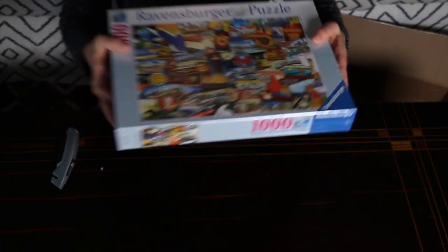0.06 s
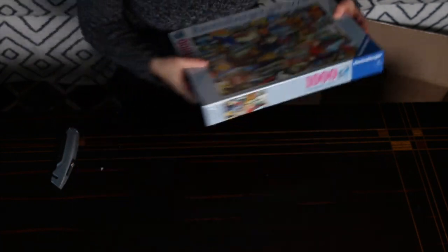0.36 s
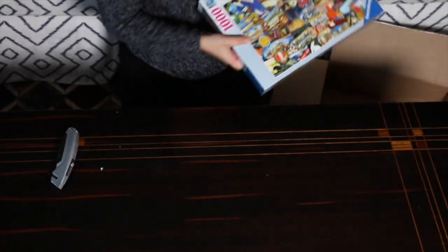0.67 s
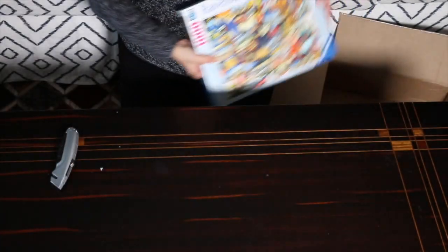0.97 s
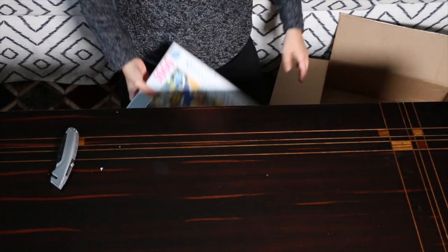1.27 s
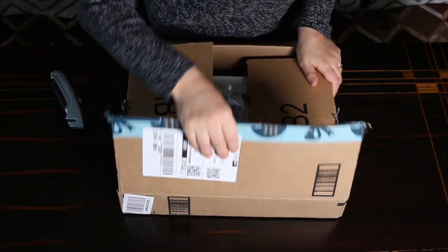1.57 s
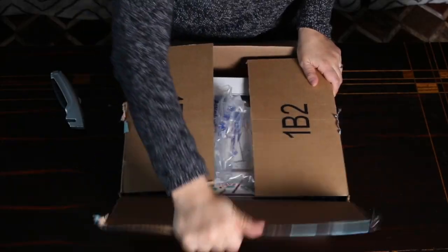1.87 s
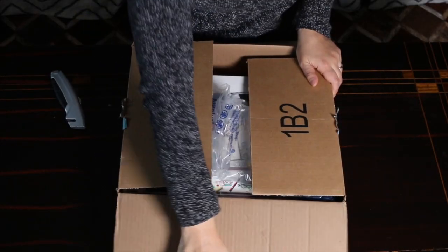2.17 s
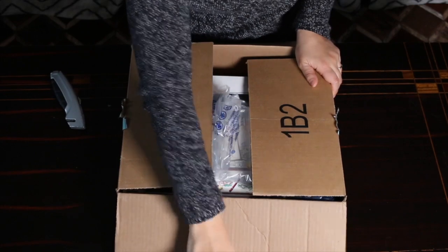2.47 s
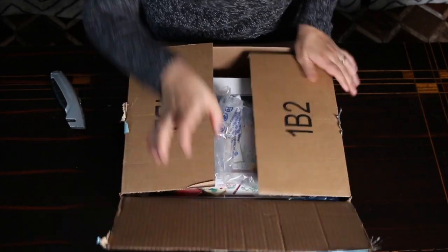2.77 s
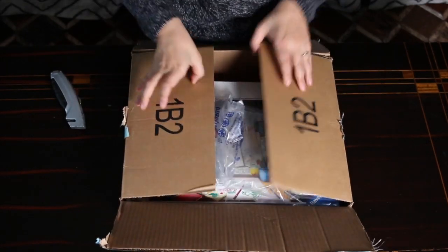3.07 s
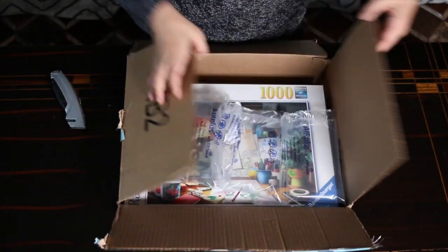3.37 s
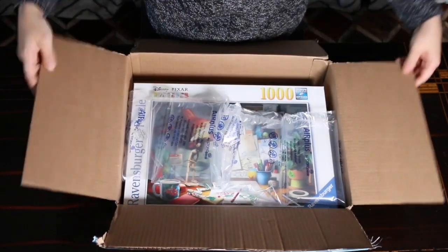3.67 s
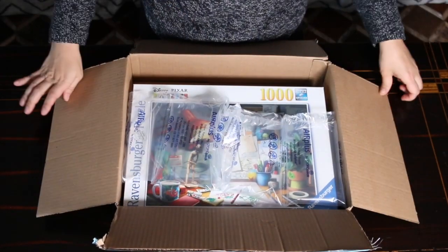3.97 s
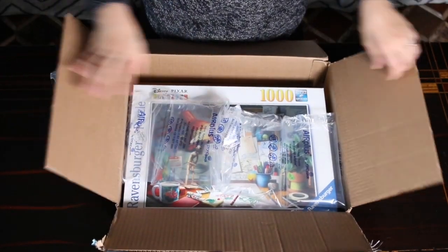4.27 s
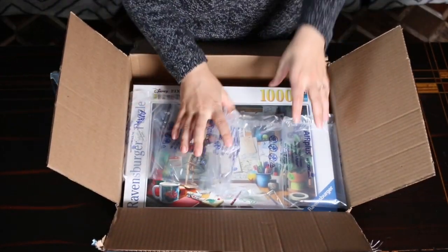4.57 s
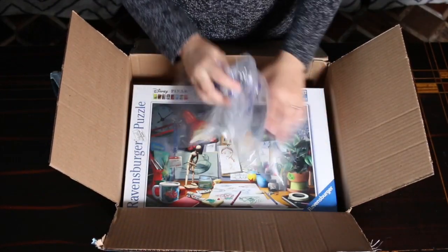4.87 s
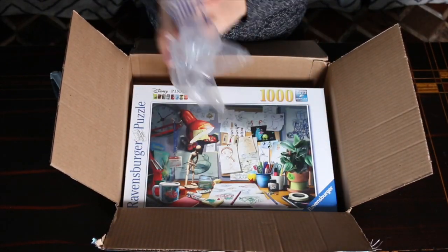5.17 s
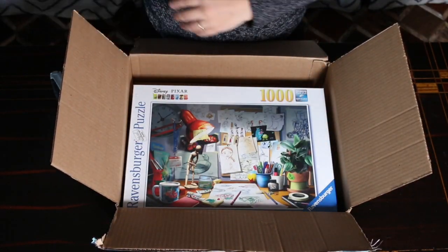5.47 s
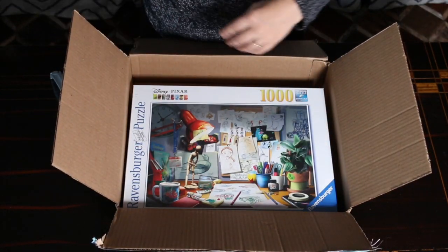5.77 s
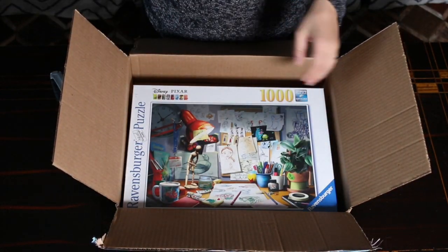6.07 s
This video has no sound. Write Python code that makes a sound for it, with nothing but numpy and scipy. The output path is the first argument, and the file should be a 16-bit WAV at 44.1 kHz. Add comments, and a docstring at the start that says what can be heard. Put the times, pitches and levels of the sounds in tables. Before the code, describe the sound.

Cardboard flaps slap down, crack and scrape open close by, followed by the crackling of plastic packing pillows being pulled out.

```python
"""Opening a cardboard box

A boxed puzzle is put aside and a shipping box is opened on a table, close up in a small room.
The front flap slaps down and its fold cracks; the side flaps scrape, squeak, knock and groan
as they are spread. Plastic air pillows are pulled out, crinkling and snapping, and dropped aside.
A limiter ducks after the two loudest blows."""
import sys
import numpy as np
from scipy import signal
from scipy.io import wavfile
from scipy.ndimage import uniform_filter1d

SR = 44100
rng = np.random.default_rng(int(sys.argv[2]) if len(sys.argv) > 2 else 0)


def log_audio(samples):
    """Write samples as a 16-bit WAV file to the path given in sys.argv[1]."""
    # one column per channel
    frames = np.atleast_2d(samples).T
    # limit to full scale, then quantise
    limited = np.clip(frames, -1, 1)
    pcm = np.round(limited * 32767).astype(np.int16)
    wavfile.write(sys.argv[1], SR, pcm)


N = 270333
TIME = np.arange(N) / SR
HIT_TIME = np.arange(8192) / SR  # seconds into a one-shot
BINS = np.fft.rfftfreq(4096, 1 / SR)

# Cue levels are faders; each layer adds its own trim. an edge catches and drags, and at 1.943 s a short rush of
# air leads into the flap slap: (time [s], level [dB], decay [s], hiss over level [dB], rasp pitch [Hz], rasp
# over level [dB])
EDGE_SCUFFS = [(0.099, -57, 0.014, -18, 640, 7), (0.126, -48.5, 0.019, -10, 605, 4),
               (1.006, -56.5, 0.067, 5, 2700, 5), (1.268, -68.5, 0.093, 18.5, 2820, -2),
               (1.44, -49, 0.026, 3.5, 2480, 0), (1.836, -37, 0.017, 4.5, 680, 6),
               (1.879, -38, 0.021, -8, 785, 4), (1.943, -24, 0.0042, -10, 890, -14),
               (2.154, -32, 0.014, -16, 2980, 1.5), (2.955, -47.5, 0.15, -16, 1630, 0.5),
               (3.076, -31.5, 0.012, -3, 1580, 5.5), (3.09, -32, 0.028, 0.5, 1710, 4.5),
               (3.655, -40.5, 0.075, 1.5, 524, 4), (3.963, -47, 0.049, -12, 597, 12.5),
               (4.183, -23.5, 0.0047, -5.5, 3280, 1), (4.205, -28, 0.052, -7, 523, -10),
               (4.312, -31.5, 0.014, -23, 820, -5), (6.055, -36.5, 0.054, 9, 2090, 4)]
# fingers and flaps hit the box: (time [s], clack [dB], thump [dB], thump pitch [Hz])
BOX_KNOCKS = [(0.128, -58, -42, 196), (0.594, -52, -40.5, 212), (1.362, -36, -39.5, 574),
              (1.559, -26.5, -34.5, 211), (1.822, -31, -28, 231), (3.014, -21.5, -21.5, 215),
              (3.336, -27.5, -31.5, 865), (3.371, -25.5, -55, 736), (3.408, -29, -35, 243),
              (3.926, -26.5, -30.5, 233), (3.959, -34, -24.5, 760), (3.978, -43, -27, 244.6),
              (3.994, -45, -30, 380), (4.01, -29.5, -22, 329), (4.183, -16.5, -31, 224),
              (4.191, -19.5, -18.5, 240), (4.213, -32, -21, 522), (4.255, -20.5, -23, 760),
              (4.306, -35, -28.5, 239), (4.321, -48, -30.5, 750), (4.603, -18.5, -32, 234),
              (4.619, -23, -27, 234), (5.58, -29, -40, 389), (5.666, -32.5, -36.5, 357)]
# a hand or flap slides over cardboard: (start [s], length [s], drone [dB], hiss [dB])
SLIDES = [(0.276, 0.19, -79, -59.5), (0.37, 0.22, -52, -73), (0.57, 0.27, -53, -66),
          (0.81, 0.26, -54.5, -74), (0.96, 0.24, -63, -56), (1.093, 0.61, -52, -54),
          (1.441, 0.12, -48, -44.5), (1.55, 0.37, -50.5, -57.5), (1.716, 0.17, -54, -43),
          (1.791, 0.27, -40.5, -38.5), (2.131, 0.24, -48, -43.5), (2.546, 0.28, -44, -48.5),
          (2.81, 0.19, -39.5, -49.5), (2.952, 0.058, -46, -43.5), (3.002, 0.28, -38.5, -42.5),
          (3.325, 0.49, -45, -44), (3.585, 0.3, -44.5, -44.5), (3.77, 0.33, -46, -48),
          (4.329, .25, -61, -79)]
# the largest creases snap over, and the crack at 1.822 s sharpens a knock: (time [s], level [dB])
CREASE_SNAPS = [(1.271, -43), (1.305, -37), (1.325, -39), (1.822, -24.5), (4.542, -26.5), (4.603, -22.5),
                (4.637, -10), (4.669, -13.5), (4.683, -10), (4.714, -10), (4.747, -13), (4.78, -5),
                (4.808, -7.5), (4.837, -5), (4.843, -12.5), (4.931, -8.5), (5.04, -27), (5.073, -10),
                (5.17, -19), (5.203, -7), (5.476, -25), (5.62, -24.5), (5.676, -31), (5.727, -26.5),
                (5.748, -22), (5.852, -25.5), (5.944, -31), (6.072, -18), (6.075, -10.5)]
# the front flap lands and rebounds: (time [s], level [dB], crack over level [dB])
FLAP_SLAPS = [(1.948, 10, -13), (1.9638, -5, -9)]
# its fold gives way in two jerks: (time [s], level [dB], splinter over level [dB])
FOLD_CRACKS = [(2.3121, 4.5, -21), (2.318, 5.5, -9)]
# a flap edge squeaks along its neighbour: (start [s], length [s], pitch [Hz], level [dB])
FLAP_SQUEAKS = [(3.087, 0.049, 594, -29.5)]
# the squeak's harmonics: (multiple of the pitch, level [dB])
SQUEAK_HARMONICS = [(1, -3.5), (3, 0), (5, -3.5)]
# a swinging flap shoves the air: (time [s], level [dB], pitch [Hz], decay [s])
AIR_PUFFS = [(3.63, -26.5, 90, 0.0058)]
# the rising groan of a side flap bent back: (time [s], pitch [Hz], level [dB])
GROAN_CURVE = [(4.196, 263, -40), (4.223, 338.5, -22), (4.243, 472, -29), (4.256, 807, -24),
               (4.272, 813, -29), (4.3, 840, -52)]
# pillows are squeezed, lifted out and dropped: (start [s], hold [s], fizz [dB], hollow rustle [dB])
PILLOW_MOVES = [(4.578, .06, -30, -36), (4.645, 0.13, -27, -38.5), (4.768, 0.17, -26, -39),
                (4.881, 0.392, -22.5, -34.5), (5.245, 0.12, -22, -32.5), (5.45, 0.045, -36, -37.5),
                (5.628, 0.17, -38, -55), (5.796, 0.46, -46.5, -55.5)]

# resonances of handled cardboard: (frequency [Hz], width [Hz], level [dB])
PANEL_RESONANCES = [(240, 66, 7), (394, 20, 11.5), (535, 55, 2.5), (756, 280, 0.5), (1040, 250, -17),
                    (1570, 100, -9), (1790, 480, -6), (2700, 290, -12)]
# ringing cardboard: (frequency [Hz], level [dB], t60 [s])
SLAPPED_BOX_MODES = [(133, -19, 0.019), (199, -5.5, 0.089), (243.5, -11, 0.12), (306, 5, 0.017),
                     (418, -11.5, 0.046), (433, -17, 0.097), (537, -11.5, 0.031), (764, -19, 0.031),
                     (1200, -13, 0.013)]
TAUT_FLAP_MODES = [(421, -45, 0.055), (498, -6, 0.025), (699, -2.5, 0.025), (858, -10.5, 0.036),
                   (1210, 3.5, 0.0055), (1810, -8.5, 0.019), (2500, -6, 0.0091)]

# tone curves of the noise layers: (frequency [Hz], relative level [dB])
CLACK_EQ = [(40, -17), (100, -5), (350, -1), (800, 4.5), (1800, -2), (3200, -13.5), (7000, -17.5),
            (16000, -21.5)]  # dry cardboard
HISS_EQ = [(300, -37), (1200, 11), (2800, 13), (6000, 7.5), (9000, 2), (16000, -13.5)]  # paper surface
BRUSH_EQ = [(300, -7), (1500, 5), (3000, 1.5), (6000, 1.5), (9000, 1), (11000, 1), (16000, 3.5)]  # brushing cloth
SNAP_BODY_EQ = [(50, -29), (150, -13), (500, 17), (2000, 10.5), (4500, 6), (8000, -10), (16000, 2)]  # a crease's midrange pop
SNAP_EDGE_EQ = [(100, -5), (1000, 9), (5000, 15), (8000, 14), (12500, 8), (16000, 6)]  # its bright click
SLAP_BLOOM_EQ = [(40, -10), (100, -8.5), (180, -1.5), (290, -1), (420, 3.5), (480, -4), (560, -11),
                 (800, -18), (2000, -25), (5000, -33.5), (9000, -36.5), (16000, -55)]  # what the slap throws into the room
CRACK_BLOOM_EQ = [(80, -16), (300, 4.5), (650, 5.5), (1200, 3), (2600, -1), (3800, -13), (7000, -16),
                  (10000, -25), (16000, -41)]  # what the fold throws into the room
FILM_EQ = [(100, -22), (600, -1.5), (1500, 2), (2600, -1.5), (4500, -2.5), (7000, -3), (10000, -5),
           (16000, -12)]  # thin plastic
PILLOW_EQ = [(60, -38), (130, -9.5), (210, 0), (330, -0.5), (600, -0.5), (1100, -5.5), (1700, -6),
             (3000, -32), (8000, -33)]  # air-filled pillows
FLOOR_EQ = [(20, -15), (40, -7), (60, 1), (110, -10), (250, -7), (500, -13), (1000, -21.5), (3000, -28),
            (6500, -28.5), (8700, -33.5), (10900, -22), (12800, -31.5), (16000, -25)]  # steady background noise

# the room's decay: (frequency [Hz], t60 [s])
REVERB_T60 = [(100, 0.8), (250, 0.1959), (600, 0.7038), (2000, 0.72), (5000, 0.83), (9000, 0.42),
              (16000, 1.32)]
# colour of the reverb and the microphone: (frequency [Hz], gain [dB])
REVERB_EQ = [(60, 15), (160, -3), (400, 4.5), (1200, 0.5), (3000, 0.5), (8000, 3.5), (16000, -8)]
MIC_EQ = [(20, -5), (5500, 1), (6900, 0), (8700, 6.5), (9700, 0), (10900, -8.5), (12800, 2), (16000, -7)]


def amp(db):
    """Decibels to gain."""
    return 10 ** (np.asarray(db) / 20)


def unit(x):
    """Scales to rms 1."""
    return x / np.sqrt(np.mean(x ** 2) + 1e-20)


def read(points, hz):
    """Reads a curve on a log-frequency axis."""
    f, value = np.transpose(points)
    return np.interp(np.log(hz + 1), np.log(f + 1), value)


def add(mix, s, sound):
    """Mixes a sound in at s seconds."""
    part = mix[max(round(s * SR), 0):][:len(sound)]
    part += sound[:len(part)]


def colour(x, gain, keep_power=True):
    """Minimum-phase filter from a gain over BINS; keep_power holds white noise at its level."""
    if keep_power:
        gain = gain / np.sqrt(np.mean(gain ** 2))
    log_gain = np.log(np.maximum(gain, 1e-5))
    mirrored = np.concatenate([log_gain, log_gain[-2:0:-1]])
    taps = np.fft.ifft(np.exp(np.conj(signal.hilbert(mirrored)))).real
    return signal.fftconvolve(x, taps)[:len(x)]


def eq(x, curve, keep_power=True):
    """Shapes a sound with a tone curve."""
    return colour(x, amp(read(curve, BINS)), keep_power)


def resonance(hz, q):
    """Gain over BINS of one resonant peak."""
    return 1 / np.hypot(1, q * (BINS / hz - hz / (BINS + 1)))


def panel(x):
    """Plays a sound through a cardboard panel's resonances, with the top rolled off."""
    power = sum(amp(db) ** 2 / (1 + ((BINS ** 2 - hz ** 2) / (width * BINS + 1)) ** 2)
                for hz, width, db in PANEL_RESONANCES)
    return colour(x, np.sqrt(power / (1 + (BINS / 5000) ** 2)))


def grains(size, per_s, spread_db):
    """Tiny clicks at random moments, their heights scattered by spread_db; rms 1."""
    chance, strength, sign = rng.random((3, size))
    height = amp(spread_db * np.minimum(-np.log(1 - strength), 4))
    return unit((chance < per_s / SR) * height * np.sign(sign - .5))


def burst(decay_s):
    """A short dying puff of noise."""
    return rng.standard_normal(len(HIT_TIME)) * np.exp(-HIT_TIME / decay_s)


def ring(modes, rise_s):
    """Struck modes build up during the contact, then die away."""
    tones = sum(amp(db - 60 * HIT_TIME / t60) * np.sin(2 * np.pi * hz * HIT_TIME)
                for hz, db, t60 in modes)
    return (1 - np.exp(-HIT_TIME / rise_s)) * tones


def arch(length, peak):
    """Speed of a hand move: from rest up to 1 at the share peak of its length, and back to rest."""
    progress = np.arange(0, length, 1 / SR) / length
    return np.sin(np.pi * progress ** (np.log(.5) / np.log(peak)))


def pressure(per_s, depth_db):
    """Uneven hand pressure: a gain that wanders at random."""
    knots = np.arange(0, TIME[-1] + 1, 1 / per_s)
    wander = rng.standard_normal(4096)[:len(knots)]
    return unit(amp(depth_db * np.interp(TIME, knots, wander)))


def waver(size, depth, smooth_samples):
    """A pitch factor that jitters around 1."""
    return 1 + depth * unit(uniform_filter1d(rng.standard_normal(SR), smooth_samples))[:size]


def scuffs():
    """Short drags, and one brief rush of air before the flap slap: a run of slips swells and dies, rasping in
    two modes of the caught edge."""
    out = np.zeros(N)
    for s, db, decay, hiss_db, hz, rasp_db in EDGE_SCUFFS:
        rise = 0.27 * decay
        swell = np.minimum(HIT_TIME / rise, np.exp((rise - HIT_TIME) / decay))
        deep, mid, fine, edge = (swell * grains(len(swell), per_s=2500, spread_db=2) for _ in range(4))
        body = amp(-5.5) * panel(deep) + amp(-1) * eq(mid, CLACK_EQ)
        rasp = colour(edge, resonance(hz, q=6.3) + amp(-14) * resonance(hz * 1.9, q=33))
        add(out, s, amp(db) * (body + amp(hiss_db) * eq(fine, HISS_EQ) + amp(rasp_db) * rasp))
    return out


def knocks():
    """Each knock bends a panel (thump), rattles the flutes (clack) and ticks on the surface."""
    out = np.zeros(N)
    for s, clack_db, thump_db, hz in BOX_KNOCKS:
        cycles = hz * HIT_TIME
        flex = np.sin(2 * np.pi * cycles) * np.exp(-cycles / 4.34) * (1 - np.exp(-cycles / 0.22))
        thump = amp(thump_db + 2.5) * (flex + 0.26 * panel(burst(0.019)))
        clack = amp(clack_db - 5.5) * eq(burst(0.0054), CLACK_EQ)
        tick = amp(clack_db - 19) * eq(burst(0.0082), HISS_EQ)
        add(out, s, thump + clack + tick)
    return out


def sliding():
    """Friction makes panels drone, paper rasp and cloth hiss, all riding the speed of the stroke."""
    drone = panel(grains(N, per_s=2500, spread_db=0))
    rasp = amp(-6.5) * eq(grains(N, per_s=1700, spread_db=0), CLACK_EQ)
    hiss = eq(grains(N, per_s=7200, spread_db=3.5), BRUSH_EQ)
    rub_gain, hiss_gain = np.zeros((2, N))
    for s, length, drone_db, hiss_db in SLIDES:
        speed = arch(length, peak=0.22)
        add(rub_gain, s, amp(drone_db - 3) * speed ** 0.7)
        add(hiss_gain, s, amp(hiss_db + 3.5) * speed ** 1.83)
    return (rub_gain * (drone + rasp) + hiss_gain * hiss) * pressure(per_s=60, depth_db=1.04)


def snaps():
    """Large creases flip over with a sharp crack; one such crack tops a knock."""
    out = np.zeros(N)
    for s, db in CREASE_SNAPS:
        body = amp(db - 9.5) * eq(burst(0.0037), SNAP_BODY_EQ)
        edge = amp(0.59 * db - 10) * eq(burst(0.001), SNAP_EDGE_EQ)  # softer snaps sound thinner
        add(out, s, body + edge)
    return out


def flap_slap():
    """The front flap slaps the table, booms the box and blooms into the room."""
    out = np.zeros(N)
    for s, db, crack_db in FLAP_SLAPS:
        # the edge touches first, then the whole face
        add(out, s, amp(db + crack_db) * eq(burst(0.00099), FILM_EQ))
        add(out, s + 0.00028, amp(db + 2.5) * ring(SLAPPED_BOX_MODES, rise_s=0.0016))
        add(out, s, amp(db + 14) * eq(room_tail(), SLAP_BLOOM_EQ))
    return out


def fold_crack():
    """Pressed further, the fold splinters, rings the taut flap and fills the room."""
    out = np.zeros(N)
    for s, db, splinter_db in FOLD_CRACKS:
        splinter = eq(burst(0.0013), HISS_EQ) + amp(-0.5) * eq(burst(0.0023), SNAP_BODY_EQ)
        flap = ring(TAUT_FLAP_MODES, rise_s=0.00057)
        add(out, s, amp(db) * (amp(splinter_db - 4) * splinter - flap))
        add(out, s, amp(db + 9) * eq(room_tail(), CRACK_BLOOM_EQ))
    return out


def squeak(sag_hz_per_s=630):
    """Two flaps stick and slip; the pitch sags as the pressure eases."""
    out = np.zeros(N)
    for s, length, hz, db in FLAP_SQUEAKS:
        speed = arch(length, peak=0.56)
        pitch = hz - sag_hz_per_s * TIME[:len(speed)]
        cycles = np.cumsum(pitch * waver(len(speed), depth=0.026, smooth_samples=100)) / SR
        tone = sum(amp(level) * np.sin(2 * np.pi * k * cycles) for k, level in SQUEAK_HARMONICS)
        add(out, s, amp(db) * speed * tone)
    return out


def air_puff():
    """A swinging flap shoves the air: a soft low push with no click."""
    out = np.zeros(N)
    for s, db, hz, decay in AIR_PUFFS:
        swell = HIT_TIME / decay * np.exp(1 - HIT_TIME / decay)
        add(out, s, amp(db) * swell * np.sin(2 * np.pi * hz * HIT_TIME))
    return out


def groan():
    """A side flap's fold sticks and slips, faster and a little unevenly as it is strained."""
    s, hz, db = np.transpose(GROAN_CURVE)
    t = np.arange(s[0], s[-1], 1 / SR)
    pitch = np.interp(t, s, hz) * waver(len(t), depth=0.049, smooth_samples=60)
    phase = 2 * np.pi * np.cumsum(pitch) / SR
    tone = unit(np.sin(phase) + amp(-11) * np.sin(2 * phase))
    out = np.zeros(N)
    add(out, s[0], amp(np.interp(t, s, db) - 6) * tone)
    return out


def crinkle(attack_s=0.041, release_db_per_s=217):
    """Thin film fizzes and crackles as it creases, over the hollow rustle of the air pillows."""
    fizz = eq(grains(N, per_s=6000, spread_db=3.5), FILM_EQ)
    clicks = grains(N, per_s=200, spread_db=1)
    crackle_power = signal.lfilter([1], [1, -np.exp(-1 / (0.00089 * SR))], clicks ** 2)  # short tails
    crackle = unit(eq(np.sqrt(crackle_power) * rng.standard_normal(N), FILM_EQ))
    film = amp(-3) * fizz + amp(-4.5) * crackle
    hollow = eq(grains(N, per_s=1000, spread_db=2), PILLOW_EQ)
    film_gain, hollow_gain = np.zeros((2, N))
    for s, hold, fizz_db, hollow_db in PILLOW_MOVES:
        tighten = np.clip((TIME - s) / attack_s, 0, 1)
        relax = amp(-release_db_per_s * np.maximum(TIME - s - hold, 0))
        film_gain = np.maximum(film_gain, amp(fizz_db) * tighten * relax)
        hollow_gain = np.maximum(hollow_gain, amp(hollow_db) * tighten * relax)
    return (film_gain * film + hollow_gain * hollow) * pressure(per_s=70, depth_db=1.1)


def room_tail():
    """Sparse reflections build up, then each band dies at its own speed; energy 1."""
    reflections = grains(SR, per_s=6000, spread_db=-1) * np.clip((TIME[:SR] - .004) / 0.0043, 0, 1)
    hz, frame_s, bands = signal.stft(reflections, SR, nperseg=256)
    decay = amp(-60 * frame_s / read(REVERB_T60, hz)[:, None])
    tail = signal.istft(bands * decay, SR, nperseg=256)[1]
    return tail / np.linalg.norm(tail)


def room(x, wet_db):
    """Adds the small room's reverb."""
    tail = eq(room_tail(), REVERB_EQ, keep_power=False)
    return x + amp(wet_db) * signal.fftconvolve(x, tail)[:N]


def scene():
    """Cardboard and plastic sit dead centre in one room; only a trace of background noise is wide."""
    cardboard = room(sliding() + scuffs() + groan() + air_puff(), wet_db=-9.5)
    cardboard += room(squeak(), wet_db=-17) + room(knocks(), wet_db=-5)
    plastic = room(crinkle() + snaps(), wet_db=-10.5)
    blows = flap_slap() + fold_crack()
    middle = cardboard + plastic + blows + amp(-51) * eq(rng.standard_normal(N), FLOOR_EQ)
    side = amp(-74) * eq(rng.standard_normal(N), FLOOR_EQ)
    return np.array([middle + side, middle - side])


def limiter(x, recover_db_per_s, attack_s):
    """The gain ducks on a peak over full scale and climbs back steadily."""
    over_db = np.maximum(20 * np.log10(abs(x).max(0) + 1e-9), 0)
    recovery_db = recover_db_per_s * TIME
    duck_db = np.maximum.accumulate(over_db + recovery_db) - recovery_db
    pole = np.exp(-1 / (attack_s * SR))
    return x * amp(-signal.lfilter([1 - pole], [1, -pole], duck_db))


def record(dry):
    """Microphone colour, limiter, hard clipping and a steep high cut."""
    heard = np.array([eq(channel, MIC_EQ, keep_power=False) for channel in dry])
    limited = limiter(heard, recover_db_per_s=55, attack_s=0.0027)
    high_cut = signal.firwin(511, cutoff=16100, window=("kaiser", 9), fs=SR)
    return signal.oaconvolve(np.clip(limited, -1, 1), high_cut[None], "same")


dry = scene()
out = record(dry)
log_audio(out)
```